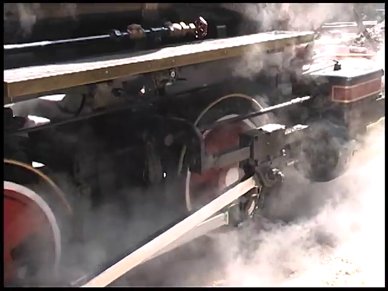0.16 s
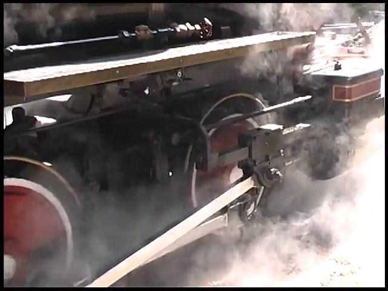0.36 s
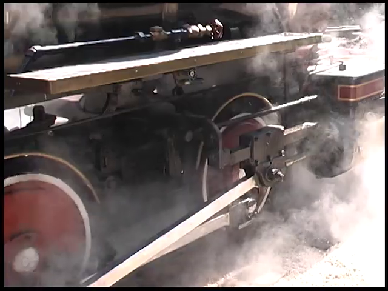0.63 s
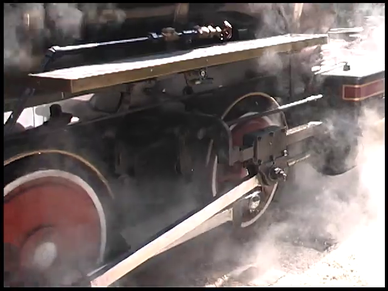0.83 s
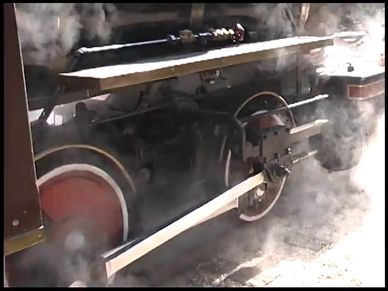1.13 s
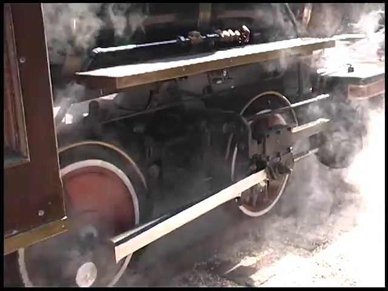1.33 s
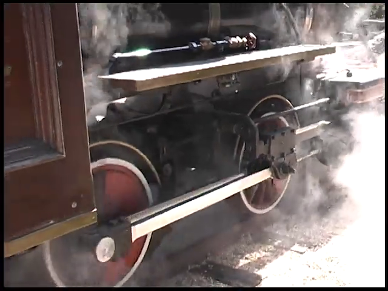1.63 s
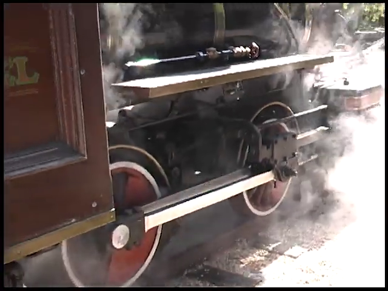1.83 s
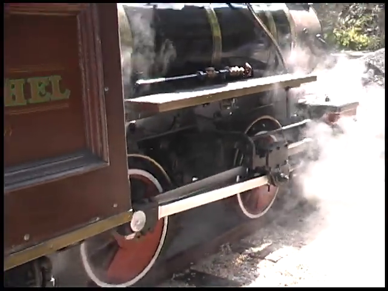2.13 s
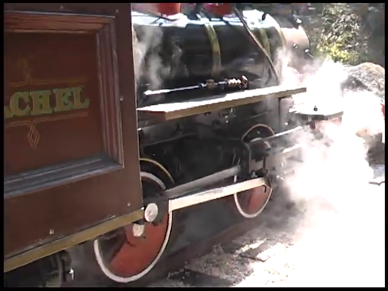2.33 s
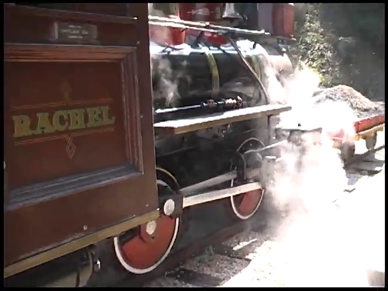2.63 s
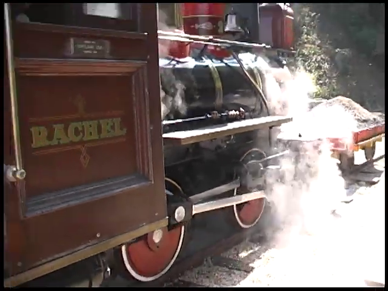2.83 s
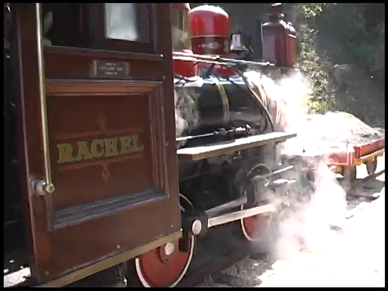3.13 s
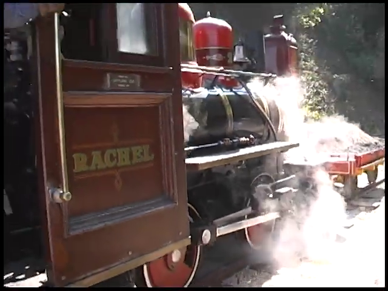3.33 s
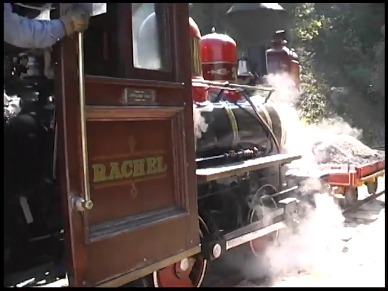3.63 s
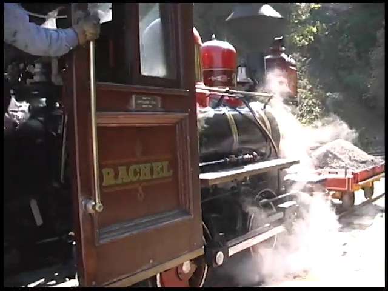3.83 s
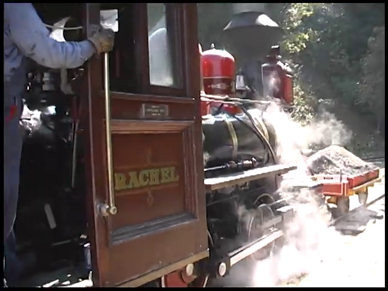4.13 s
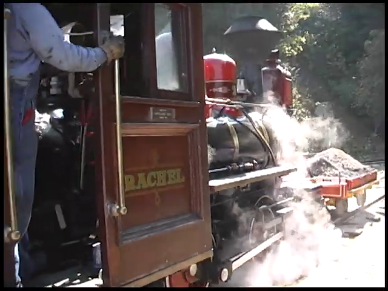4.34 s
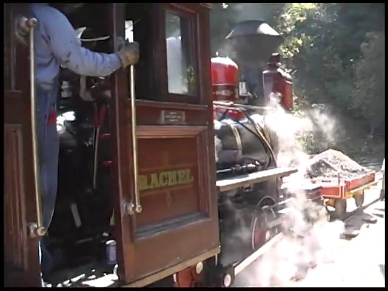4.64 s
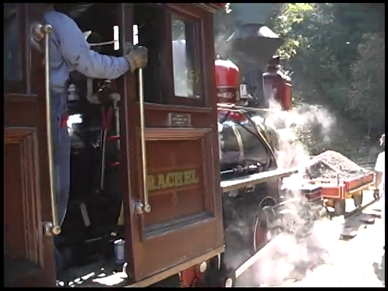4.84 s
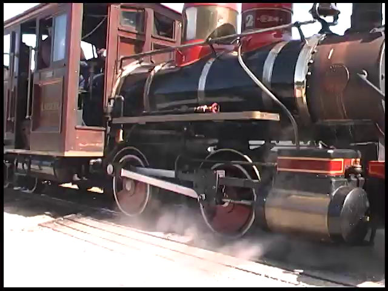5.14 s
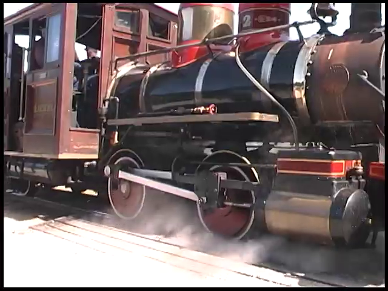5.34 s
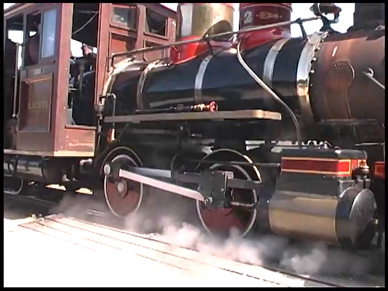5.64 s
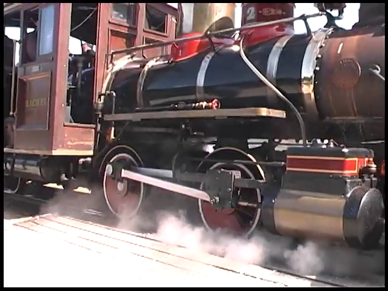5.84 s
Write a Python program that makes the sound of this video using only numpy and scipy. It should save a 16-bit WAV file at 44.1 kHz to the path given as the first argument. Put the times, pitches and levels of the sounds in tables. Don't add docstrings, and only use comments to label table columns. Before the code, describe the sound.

A small steam locomotive pulls away outdoors, heard in stereo from close beside the track. From 0 s a dense, wet, fluttering steam hiss dominates, bright through the upper mids but with the extreme treble cut off. Exhaust beats begin near 0.4, 0.8, 1.3, 1.7, 2.2, 2.6, 3.2, 3.6, 4.1, 4.5 and 5.0 s, in alternating shorter and longer gaps. Each swells quickly into a low thump, a hollow chimney puff and a breathy whistling fizz, nudging the hiss louder, then dies away. Underneath, a very deep flue throb and a humming firebox roar surge with the draught, strongest around 0.3 s. Slight metallic colouring and short reflections surround it. The hiss gradually weakens and drifts from slightly left to centre. At 5.2 s an abrupt cut drops to a much quieter, thinner, distant hiss, with one faint puff near 5.9 s before the end at 6 s.

```python
import sys
import numpy as np
from scipy import signal
from scipy.fft import rfft, irfft, next_fast_len
from scipy.io import wavfile
from scipy.ndimage import uniform_filter1d, map_coordinates

SR = 44100
rng = np.random.default_rng(int(sys.argv[2]) if len(sys.argv) > 2 else 0)


def generate_wav(signal):
    frames = np.transpose(np.atleast_2d(signal))
    scaled = np.clip(frames, -1, 1) * 32767
    pcm = np.round(scaled).astype(np.int16)
    wavfile.write(sys.argv[1], SR, pcm)


def invert_db(x):
    u = np.asarray(x, float) / 20
    return 10 ** u


N = 263702
TIME = np.arange(N) / SR
JUMP_S = 5.207

# valve_opens_s, strength_db, nozzle_bite_db, chimney_hz, smokebox_hz
BEATS = [(-0.165, -35, -13, 750, 127), (0.363, -33.5, 1, 710, 148), (0.765, -32, 2, 706, 131),
         (1.291, -34, 2, 694, 160), (1.685, -32.5, 0, 724, 197), (2.218, -35, 5, 673, 157),
         (2.636, -34, 4.5, 760, 204), (3.157, -35.5, 6, 713, 148), (3.562, -35, 4, 755, 210),
         (4.107, -36, 4.5, 750, 139), (4.508, -34, 1.4, 696, 139), (5.044, -34.5, 0, 680, 162)]
# valve_opens_s, strength_db, nozzle_bite_db, chimney_hz, smokebox_hz
FAR_BEATS = [
    (5.09, -50, 1.5, 776, 200),
    (5.918, -49, -4, 780, 210),
]
# frequency_hz, likeness_0_to_1
NEAR_ALIKE = [(150, 1), (330, .97), (600, 0.32), (1000, 0.54), (1700, 0.68), (2400, 0.84), (10000, 0.77),
              (12000, 0.65), (15000, 0.25)]
# frequency_hz, level_db
NEAR_LEAN = [(120, 1.6), (260, -0.2), (500, 3.5), (850, 5.5), (1300, 2.5), (2200, -0.5), (9000, -1.1),
             (12000, -3.5)]


def unit(x):
    return x / np.sqrt(np.mean(x ** 2) + 1e-20)


def along(points, hz):
    f, v = np.transpose(points)
    return np.interp(np.log(hz + 1), np.log(f + 1), v)


def colour(points):
    return lambda hz: invert_db(along(points, hz))


def curve(spans):
    s, value = np.transpose(np.concatenate(spans))
    return np.interp(TIME, s, value)


def wobble(rate):
    knots = rng.standard_normal(int(N * rate / SR) + 4)
    return map_coordinates(knots, [TIME * rate])


def balance(left_over_right_db):
    return invert_db(np.outer([0.5, -0.5], left_over_right_db))


def filtered(x, response):
    n = x.shape[-1]
    m = next_fast_len(n + 8192)
    spectrum = rfft(x, m) * response(np.fft.rfftfreq(m, 1 / SR))
    return irfft(spectrum, m)[..., :n]


def resonances(modes, order=1):
    def gain(f):
        power = 0
        for centre, width, db in modes:
            peak = f * width / (centre * centre - f * f + 1j * f * width)
            power = power + np.abs(invert_db(db) * peak ** order) ** 2
        return np.sqrt(power)
    return gain


def rush(gain, alike, lean, patchy_db):
    z = signal.stft(rng.standard_normal((2, N)), nperseg=512)[2]
    patches = rng.standard_normal(z.shape[1:])
    patches = uniform_filter1d(patches, size=6, axis=0)
    patches = uniform_filter1d(patches, size=10, axis=1)
    pair = signal.istft(z * invert_db(patchy_db * unit(patches)), nperseg=512)[1][:, :N]

    def spread(hz):
        angle = np.arccos(np.clip(along(alike, hz), 0, 1)) / 2
        return gain(hz) * np.array([np.cos(angle), np.sin(angle)])

    mid, side = filtered(pair, spread)
    sides = np.array([mid + side, mid - side])
    return unit(filtered(sides, lambda hz: balance(along(lean, hz))))


def drains():
    # time_s, level_db
    jets = [
        [(0, -24.5), (0.45, -24.5), (0.9, -24), (1.4, -24.5), (1.9, -24.8), (2.4, -25.5), (2.9, -25.5),
         (3.3, -26.5), (3.8, -25.5), (4.25, -27), (4.6, -27), (4.95, -27), (5.206, -27.5)],
        [(5.208, -39.5), (5.55, -38.5), (5.75, -40), (5.98, -38.5)],
    ]
    # frequency_hz, density_db
    near_jet = [(80, -8), (330, -6.5), (420, -23.5), (800, -11.5), (1260, -4.5), (1640, -6), (2350, -1.5),
                (2800, -3.5), (4300, -1), (6000, -4), (8800, -6.5), (11000, -15), (13500, -15.5),
                (15600, -20)]
    # frequency_hz, density_db
    far_jet = [(60, -5), (220, -11), (550, -25.5), (800, -19.5), (1200, -14.5), (1650, -15.5), (2000, -10),
               (2700, -9.5), (4400, -5.5), (7000, -8.5), (10000, -10), (10900, -19), (13000, -19),
               (15600, -24)]
    # frequency_hz, likeness_0_to_1
    far_alike = [(200, .99), (330, 0.67), (550, 0.6), (1100, 0.95), (3500, 0.91), (10000, .93),
                 (11500, 0.64), (15000, 0.56)]
    # frequency_hz, level_db
    far_lean = [(250, 2.5), (450, 7), (900, 5), (1700, -0.5), (8000, -3), (12000, 2)]

    near = rush(colour(near_jet), NEAR_ALIKE, NEAR_LEAN, patchy_db=0.77)
    far = rush(colour(far_jet), far_alike, far_lean, patchy_db=1.1)
    flutter_db = 0.42 * wobble(14) + 0.64 * wobble(50) + 0.78 * wobble(900)

    kick_db, kick_rise_s, kick_fall_s = 3, 0.014, 0.039
    opens = np.array(BEATS + FAR_BEATS[1:])[:, :1]
    since = np.clip(TIME - opens, 0, None)
    kicks = np.clip(since / kick_rise_s, 0, 1) * np.exp(-since / kick_fall_s)
    level_db = curve(jets) + 3.5 + flutter_db + kick_db * np.sum(kicks, axis=0)
    return invert_db(level_db) * np.where(TIME < JUMP_S, near, far)


def exhaust():
    # frequency_hz, density_db
    thump_points = [(50, -28), (90, 0.5), (140, 6), (200, 3.5), (260, -1.5), (330, 2), (400, -8),
                    (520, -3.5), (900, -22)]
    # frequency_hz, density_db
    fizz_points = [(300, -2), (600, -2.5), (950, -1.5), (1250, -3), (1700, -1), (2700, 2.5), (3700, 1),
                   (5000, -7), (8500, -10.5), (15600, -36)]
    # frequency_hz, width_hz, level_db
    whistle_modes = [
        (2400, 330, -1),
        (3070, 820, -6),
    ]
    # frequency_hz, likeness_0_to_1
    blast_alike = [(150, 1), (330, 0.96), (420, 0.82), (530, 0.64), (720, 0.87), (1200, 1), (2400, 1),
                   (8000, 0.83)]
    # frequency_hz, level_db
    blast_lean = [(120, 1.6), (380, 2.3), (520, 3), (850, 4), (1300, -2), (2400, 1), (5000, 0)]
    # rise_s, hold_s, t60_s
    strokes = [
        (0.058, 0.087, .75),
        (0.032, 0.091, 0.55),
    ]

    thump = rush(colour(thump_points), blast_alike, blast_lean, patchy_db=-0.5)
    whistle = rush(resonances(whistle_modes), blast_alike, blast_lean, patchy_db=0.0)
    fizz = rush(colour(fizz_points), blast_alike, blast_lean, patchy_db=1.3)
    air = rush(lambda hz: (hz > 300) * (hz < 2000), blast_alike, blast_lean, patchy_db=2.3)

    fill_s = 0.02
    thump_fade_db_per_s, whistle_growth_db_per_s = 1.16, 1.07
    out = np.zeros((2, N))
    for k, (s, strength_db, bite_db, note_hz, boom_hz) in enumerate(BEATS + FAR_BEATS):
        rise, hold, t60 = strokes[k % len(strokes)]
        this_spot = (TIME < JUMP_S) == (k < len(BEATS))
        span = (TIME >= s) & (TIME < s + 1) & this_spot
        t = TIME[span] - s
        decay_db = 60 * np.clip(t - rise - hold, 0, None) / t60
        pressure = np.clip(t / rise, 0, 1) * invert_db(strength_db - decay_db)

        pipe = resonances([(note_hz, 140, 0), (1.52 * note_hz, 110, -2.5)], order=2)
        chimney = invert_db(-1.5) * unit(filtered(air[:, span], pipe))

        box = resonances([(boom_hz, 45, -1)])
        boom = filtered(thump[:, span], lambda hz: 1 + box(hz))
        boom = invert_db(5.5 - thump_fade_db_per_s * s) * (1 - np.exp(-t / fill_s)) * boom

        spurt = invert_db(1.0 - 35 * t + bite_db)
        whistling = invert_db(2.0 + whistle_growth_db_per_s * s) * whistle[:, span]
        nozzle = spurt * (whistling + invert_db(8.0) * fizz[:, span])
        out[:, span] += pressure * (boom + nozzle + chimney)
    return invert_db(0.59 * wobble(30) + 1.2 * wobble(120)) * out


def steadied(x, share):
    size = np.abs(signal.hilbert(x.mean(axis=0), next_fast_len(N))[:N])
    return unit(x / (size + 0.15) ** np.clip(share, 0, 1))


def fire():
    # frequency_hz, width_hz, level_db
    flue_modes = [(48.3, 21, 1)]
    # frequency_hz, width_hz, level_db
    firebox_modes = [(122, 26, -2.5), (210.7, 25, -0.5), (256, 63, -2)]
    # frequency_hz, width_hz, level_db
    hum_modes = [(314.5, 48, 4.5), (319.6, 14, 1.5), (353, 13, -4)]
    # time_s, pull_db
    draught = [
        [(0, -1), (.26, 4.5), (.65, -4), (1, 1), (1.7, -2.5), (2.5, 1.5), (3.6, 1), (4.5, 0.5), (5.206, -1)],
        [(5.208, 5), (5.4, -1), (5.98, -1)],
    ]
    # near_db, far_db, swing_db_per_db of draught
    levels = [
        (-32.5, -69, 0.4),
        (-39, -60, 0.96),
        (-39, -70, 1.7),
    ]

    flue = rush(resonances(flue_modes, order=2), NEAR_ALIKE, NEAR_LEAN, patchy_db=-1.5)
    roar = rush(resonances(firebox_modes, order=2), NEAR_ALIKE, NEAR_LEAN, patchy_db=-4.0)
    hum = rush(resonances(hum_modes, order=3), NEAR_ALIKE, NEAR_LEAN, patchy_db=2)
    layers = [steadied(flue, share=0.2), roar, steadied(hum, share=0.73)]

    pull_db = curve(draught)
    out = np.zeros((2, N))
    for (near_db, far_db, swing), layer in zip(levels, layers):
        spot_db = np.where(TIME < JUMP_S, near_db, far_db)
        out += invert_db(spot_db + swing * pull_db) * layer
    return out


def surroundings(x, stretch):
    # frequency_hz, width_hz, level_db
    iron = [(624, 67, -15), (1113, 27, -14), (1330, 190, -7), (1900, 27, -4), (2316, 72, -7.5)]
    # delay_s, level_db
    echoes = [(.0023, -22.5), (.0051, -31), (.0093, -20.5), (0.017, -20), (.029, -13.5)]

    x = filtered(x, lambda hz: 1 + resonances(iron)(hz))
    out = x.copy()
    for delay, db in echoes:
        then = TIME - delay * (1 + stretch * TIME)
        same_spot = (then < JUMP_S) == (TIME < JUMP_S)
        reflected = np.array([np.interp(then, TIME, side) for side in x])
        out += invert_db(db) * same_spot * reflected
    return out


def scene():
    # time_s, left_over_right_db
    drift = [
        [(0, 2.5), (1.5, 1), (3.5, 0.1), (5.206, 0)],
        [(5.208, 0.3), (5.98, -0.7)],
    ]
    steam = balance(curve(drift)) * drains() + exhaust()
    return surroundings(steam, stretch=0.03) + fire()


def roll_off(x):
    return signal.sosfilt(signal.butter(12, 15730, fs=SR, output="sos"), x)


def record(dry):
    turn_hz, turn_width_hz = 500, 270
    low_cut_hz, top_hz = 29.5, 15730

    def lag(f):
        reach = turn_hz ** 2 - f * f
        loss = 1j * f * turn_width_hz
        return (reach - loss) / (reach + loss)

    def ends(f):
        return (1j * f / (low_cut_hz + 1j * f)) ** 7 * (f < top_hz)

    sides = np.array([filtered(dry[0], lag), dry[1]])
    return roll_off(filtered(sides, ends))


dry = scene()
out = record(dry)
generate_wav(out)
```